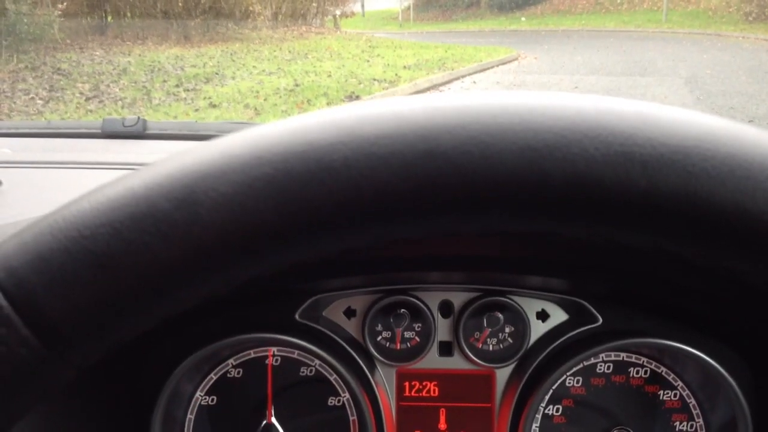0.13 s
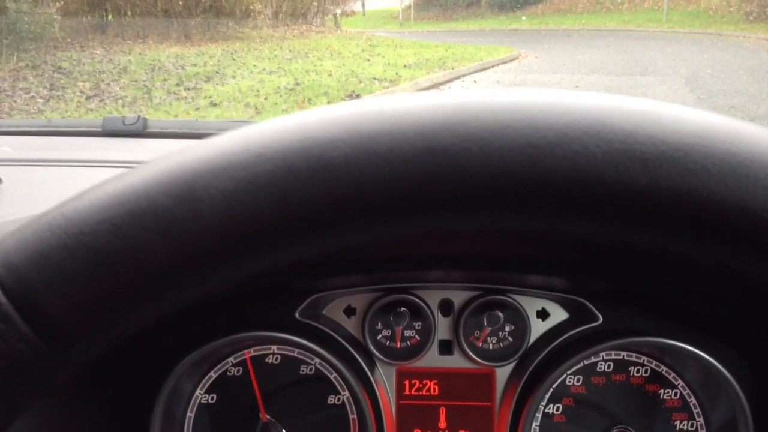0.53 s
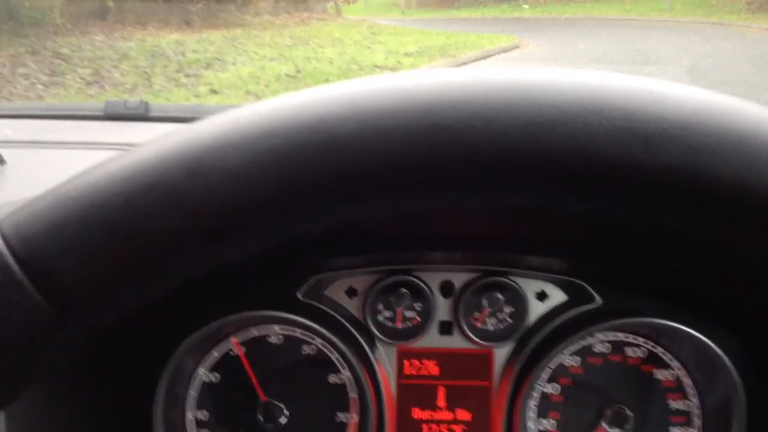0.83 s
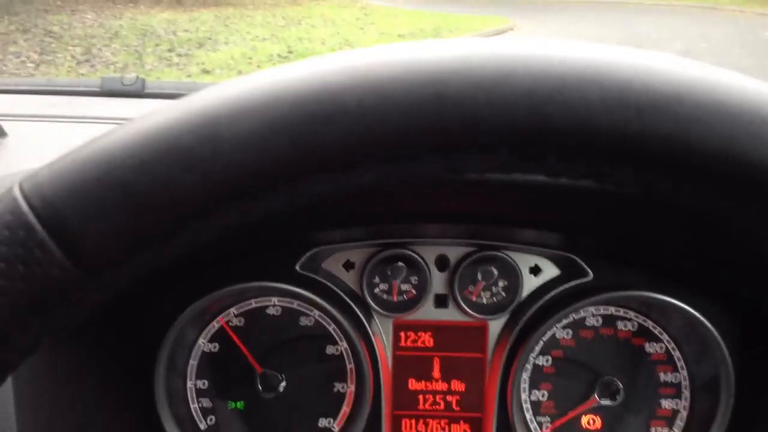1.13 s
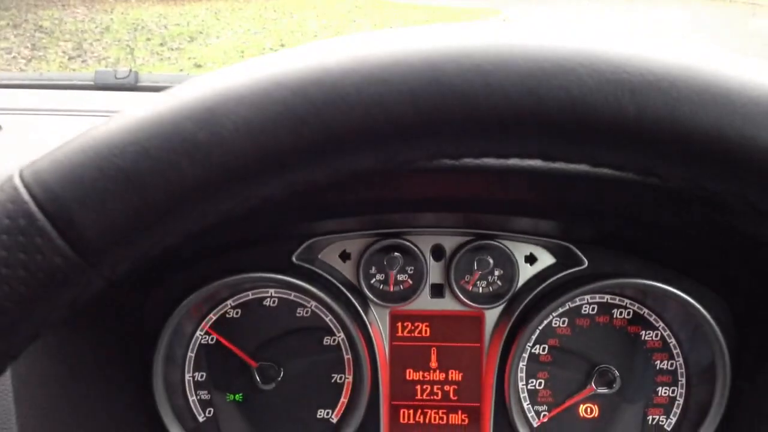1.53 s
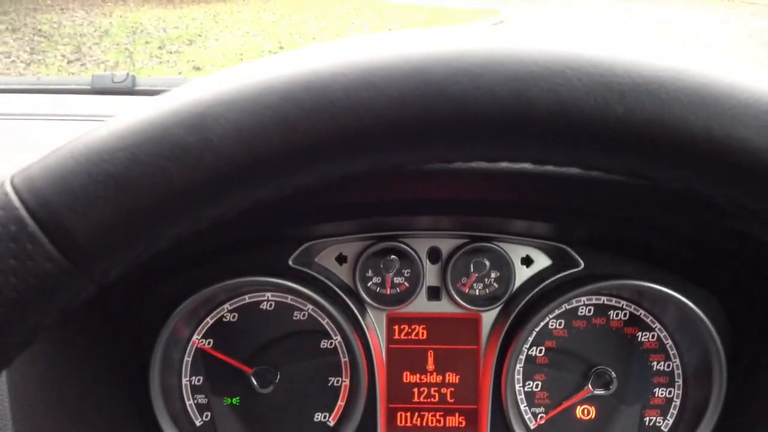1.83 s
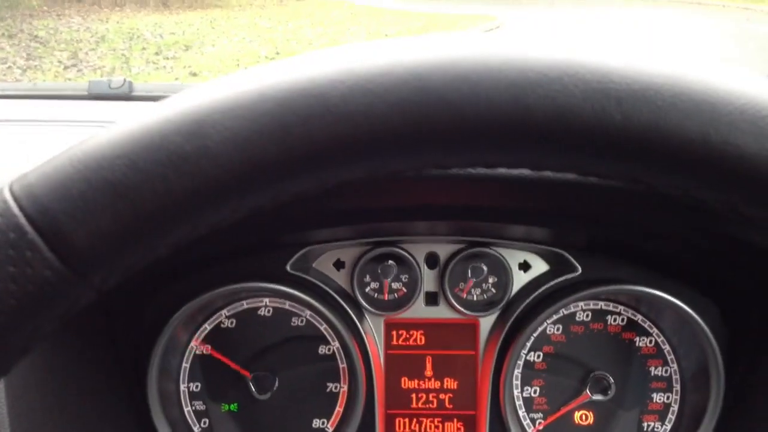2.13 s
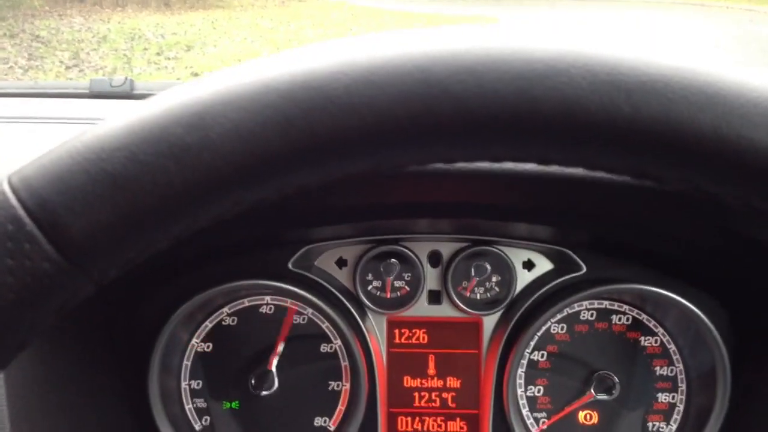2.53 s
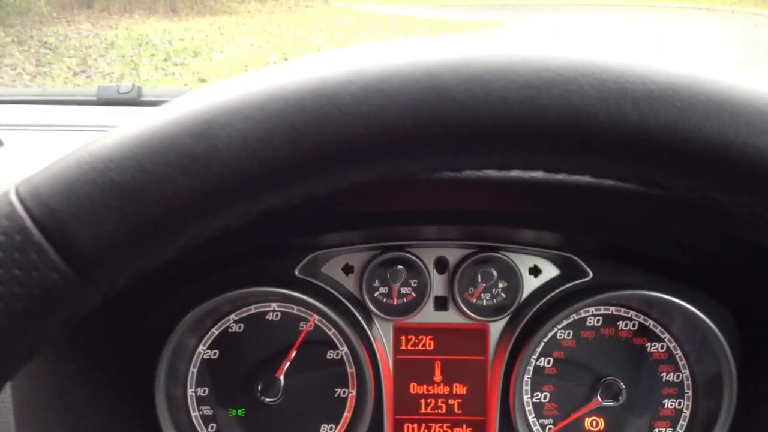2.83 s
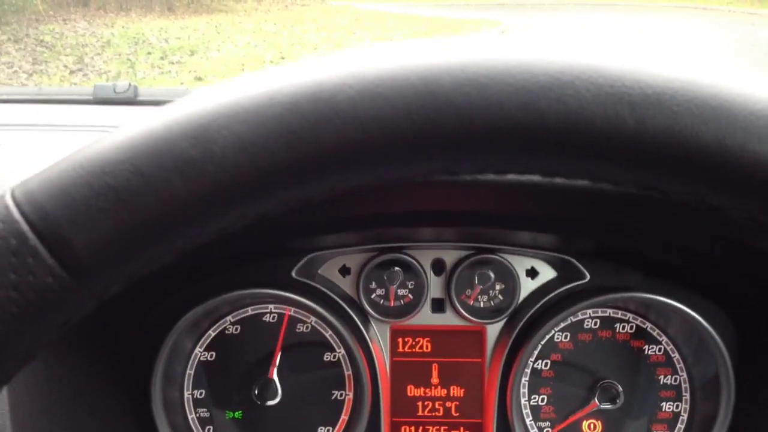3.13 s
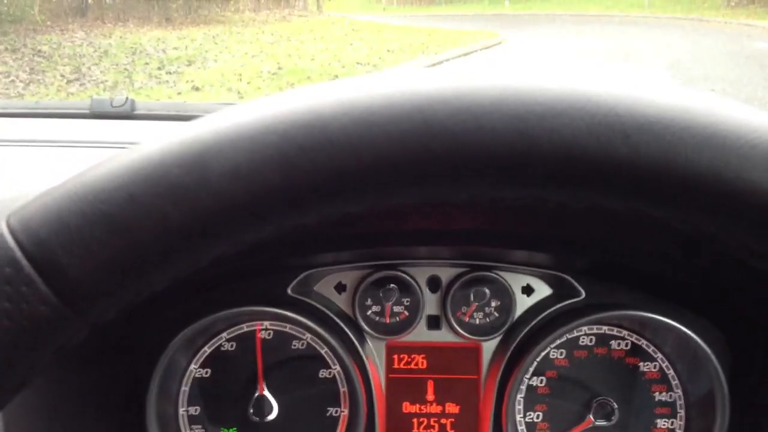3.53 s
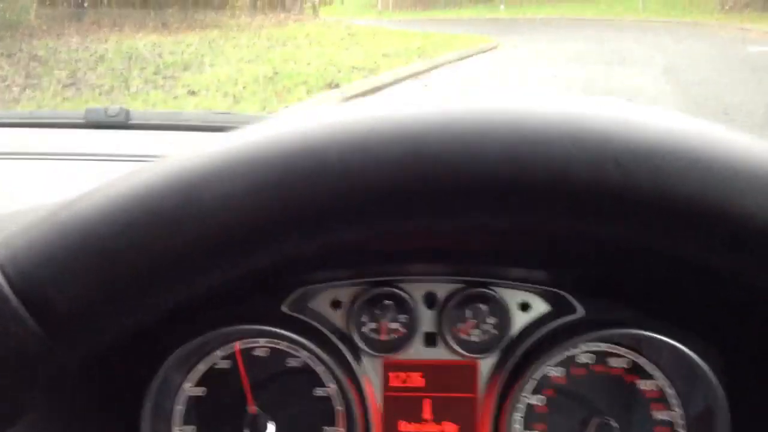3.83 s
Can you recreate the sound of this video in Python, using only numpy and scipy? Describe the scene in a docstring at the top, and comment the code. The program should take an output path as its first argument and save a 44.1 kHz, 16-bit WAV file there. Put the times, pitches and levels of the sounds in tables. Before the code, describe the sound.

Inside a parked car, the engine burbles, revs up, then sinks with a hissing puff.

```python
"""A five-cylinder turbo engine heard from the driver's seat of a parked car.
It winds down under a dying dump-valve hiss; uneven firing rings the exhaust in a soft burble.
From 1.7 s air chirps through a narrow gap in the turbo system, and one throttle blip sweeps the
engine orders through the intake resonance in a growl. At 2.5 s the throttle lifts, the dump valve
vents the boost with a puff and a hiss, and the revs sink again."""
import sys
import numpy as np
from scipy import signal
from scipy.fft import rfft, irfft
from scipy.io import wavfile

SR = 44100
rng = np.random.default_rng(int(sys.argv[2]) if len(sys.argv) > 2 else 0)


def output_pcm(signal):
    """Save a mono or channel-first signal as 16-bit PCM at the path in sys.argv[1].

    Samples are clipped to [-1, 1] before scaling.
    """
    pcm = np.clip(np.atleast_2d(signal).T, -1, 1) * 32767
    wavfile.write(sys.argv[1], SR, np.round(pcm).astype(np.int16))


N = 176400
T = np.arange(N) / SR
BIN_HZ = np.fft.rfftfreq(N, 1 / SR)
FIRING_ORDER, REF_SPEED_RPS = 2.5, 60


def amp(db):
    """Decibels to gain."""
    return 10 ** (np.asarray(db) / 20)


def unit_rms(x):
    """Scale to an rms of 1."""
    return x / np.sqrt(np.mean(x ** 2) + 1e-20)


def curve(rows, column=1):
    """Table column, interpolated over time."""
    rows = np.array(rows)
    return np.interp(T, rows[:, 0], rows[:, column])


def at_hz(spectrum, hz):
    """Spectrum, interpolated over log frequency."""
    freq_hz, value = np.transpose(spectrum)
    return np.interp(np.log(hz + 1), np.log(freq_hz + 1), value)


def wander(rate_hz, points=4000):
    """Low-passed random drift, rms about 1."""
    hz = np.fft.rfftfreq(points, T[-1] / points)
    drift = irfft(rfft(rng.standard_normal(points)) / (1 + (hz / rate_hz) ** 4))
    return np.interp(T, np.linspace(0, T[-1], len(drift)), unit_rms(drift))


def noise(colour, change_db=None):
    """Unit-level coloured noise, then shaped by change_db(hz, t)."""
    hz, t, frames = signal.stft(rng.standard_normal(N), SR, nperseg=1024, noverlap=768)
    gain = unit_rms(amp(at_hz(colour, hz)))[:, None]
    if change_db:
        gain = gain * amp(change_db(hz[:, None], t[None]))
    return signal.istft(frames * gain, SR, nperseg=1024, noverlap=768)[1][:N]


def filtered_noise(gain):
    """Unit-rms noise shaped by one gain per BIN_HZ."""
    return unit_rms(irfft(rfft(rng.standard_normal(N)) * gain, N))


def swell(start_s, length_s):
    """Half-sine envelope."""
    return np.sin(np.pi * np.clip((T - start_s) / length_s, 0, 1))


def rings(rows):
    """One short swell of a resonance per row."""
    return sum(amp(db) * swell(start_s, length_s) * np.sqrt(2) * np.sin(2 * np.pi * hz * (T - start_s))
               for start_s, length_s, hz, db in rows)


def partial(turns, order, rough, rate_hz):
    """One engine order, unsteady in level and phase."""
    angle = 2 * np.pi * (order * turns + rng.random())
    in_phase = (1 + rough * wander(rate_hz)) * np.cos(angle)
    quadrature = rough * wander(rate_hz) * np.sin(angle)
    return np.sqrt(2 / (1 + 2 * rough ** 2)) * (in_phase + quadrature)


def order_stack(speed_rps, turns, pattern, response, other_db, rough, rate_hz):
    """Orders 1 to 21.5 in half steps, except DRONE_ORDERS, swept through a fixed response."""
    levels_db, out = dict(pattern), np.zeros(N)
    for order in np.arange(1, 22, .5):
        if order not in DRONE_ORDERS:
            level_db = levels_db.get(order, other_db) + at_hz(response, order * speed_rps)
            out += amp(level_db) * partial(turns, order, rough, rate_hz)
    return out


DRONE_ORDERS = (2, 2.5, 3, 4)
# Strongest orders: time_s, order_2_db, order_2.5_db, order_3_db, order_4_db
DRONE_LEVELS = [(0, -32, -36, -50, -55), (.18, -43, -29, -45, -52.5), (.3, -42, -38.5, -59, -51),
                (.55, -52.5, -34, -46, -51.5), (.8, -61, -37.5, -69, -57.5), (1.1, -60, -55, -46.5, -72),
                (1.85, -63, -56, -67, -53.5), (2.02, -73, -42, -55, -46), (2.14, -47.5, -26, -51, -49),
                (2.25, -35.5, -27.5, -42, -52), (2.35, -34, -35, -34.5, -34),
                (2.43, -30, -35.5, -43.5, -43), (2.51, -45.5, -46, -33.5, -29.5),
                (2.61, -32, -32.5, -46, -36.5), (2.7, -25, -33, -52.5, -46), (2.82, -34, -49, -34.5, -46),
                (3, -40, -47, -40, -48), (3.14, -36, -36, -46, -49.5), (3.32, -38.5, -34, -50, -65),
                (3.5, -43.5, -40, -49, -52), (3.78, -52, -34, -70, -51.5), (4, -56, -37, -43.5, -63.5)]


def exhaust_drone(turns):
    """Clean low orders of the exhaust."""
    return sum(amp(curve(DRONE_LEVELS, column)) * partial(turns, order, rough=.14, rate_hz=12)
               for column, order in enumerate(DRONE_ORDERS, start=1))


# Weaker orders, throttle shut: order, gain_db
COAST_ORDERS = [(1, -11.5), (1.5, -8.5), (3.5, -6.5), (4.5, -4), (5, 2.5), (5.5, 1.5), (6, 4.5), (7, 5.5),
                (8, 3.5), (9, 4.5), (10, -1), (11, -1), (12, -12.5), (13, -4), (14, -9.5)]
# Cabin response to them: freq_hz, gain_db
CABIN_RESPONSE = [(30, -9), (53, 8), (100, -4.5), (150, 14), (180, 2), (213, 1), (260, -5), (295, 0.5),
                  (320, -7.5), (355, 2.5), (410, -7), (470, -9.5), (530, -8.5), (580, -10.5), (655, 6.5),
                  (705, 0), (745, -16), (778, -3), (820, -26), (870, 0.5), (920, -30), (960, -16.5),
                  (1020, -15), (1450, -15), (2500, -17)]


def coast_hum(speed_rps, turns, gain_db=-55.5, db_per_doubling=13):
    """Rough orders pass through the cabin and grow with speed."""
    orders = order_stack(speed_rps, turns, COAST_ORDERS, CABIN_RESPONSE,
                         other_db=-10, rough=.97, rate_hz=5.5)
    return orders * amp(gain_db + db_per_doubling * np.log2(speed_rps / REF_SPEED_RPS))


# High orders: order, level_db
WHINE_ORDERS = [(9, -47.5), (10, -50), (12, -58), (14, -57.5), (16, -62.5)]
# Cabin resonances: freq_hz, gain_db
WHINE_RESPONSE = [(300, -17), (560, -14.5), (630, -0.5), (690, -1.5), (740, -12.5), (780, -6.5),
                  (825, -15.5), (872, -2.5), (920, -18), (1500, -22)]


def whine(speed_rps, turns):
    """Clean high orders sing as they cross cabin resonances."""
    return sum(amp(level_db + at_hz(WHINE_RESPONSE, order * speed_rps))
               * partial(turns, order, rough=.25, rate_hz=8) for order, level_db in WHINE_ORDERS)


# Rush spectrum: freq_hz, density_db
RUSH_COLOUR = [(120, -34), (200, -7), (235, -5.5), (262, -2), (309, -6.5), (350, 1), (503, -8), (570, -11),
               (624, -5.5), (671, -2.5), (748, -13.5), (818, -19), (880, -13.5), (1020, -18), (1380, -16),
               (1570, -19), (2130, -26.5), (2650, -29), (2900, -30.5), (4090, -35.5), (4720, -37),
               (5070, -41.5), (7970, -41), (10100, -50), (15000, -42)]
# Growth with speed: freq_hz, db_per_doubling
RUSH_GROWTH = [(200, 11.5), (700, 11.9), (1500, 12.2), (3500, 15), (7000, 13.6), (14000, 10)]
# Fixed equaliser: freq_hz, gain_db
RUSH_EQ = [(200, -6), (400, -3), (680, -2.5), (1000, -1.5), (1400, 0), (2100, .5), (4600, -0.5),
           (5200, -4.5), (8000, 0), (10000, -5.5), (15000, -11)]


def rush(speed_rps, turns, load, gain_db=-43, load_db=1, low_cut_hz=290):
    """Air and machinery noise grows with speed and load, and throbs at each firing."""
    def change_db(hz, t):
        doublings = np.log2(np.interp(t, T, speed_rps) / REF_SPEED_RPS)
        growth_db = at_hz(RUSH_GROWTH, hz) * doublings + load_db * np.interp(t, T, load)
        low_cut_db = -10 * np.log10(1 + (low_cut_hz / (hz + 1)) ** 8)
        return growth_db + at_hz(RUSH_EQ, hz) + low_cut_db
    throb = .077 * np.cos(2 * np.pi * FIRING_ORDER * turns)
    lope = .059 * np.cos(np.pi * turns)  # once per two turns
    return amp(gain_db) * noise(RUSH_COLOUR, change_db) * (1 + throb + lope)


# Pipe resonances: pitch_hz, width_hz, level_db
PIPE_MODES = [(1870, 90, -60.5), (2610, 120, -69), (3330, 180, -67), (3970, 80, -64.5), (4640, 170, -60.5),
              (6150, 140, -83)]


def pipe_ring(start_s, fade_db_per_s=28.5):
    """Escaping air rings the pipes."""
    ring = sum(amp(level_db) * filtered_noise(1 / (1 + (2 * (BIN_HZ - pitch_hz) / width_hz) ** 2))
               for pitch_hz, width_hz, level_db in PIPE_MODES)
    return ring * amp(-fade_db_per_s * np.maximum(T - start_s, 0))


# Valve hiss spectrum: freq_hz, density_db
VALVE_COLOUR = [(1500, -5.5), (2500, -9), (3300, 8), (4200, -9), (4700, -8), (5100, -12), (6000, -3),
                (7000, -3.5), (8200, -2.5), (9200, -11), (10300, -15.5), (12800, -16), (15000, -19)]
# Hiss decay: freq_hz, fade_db_per_s
VALVE_FADE = [(2000, 19), (3400, 29.6), (5800, 33.8), (8000, 55), (13000, 30)]
# Valve openings, the first heard only as a tail: start_s, level_db
VALVE_RELEASES = [(-.42, -46), (2.478, -49.5)]


def dump_valve(start_s, level_db, rise_s=.032, hold_s=.059):
    """Boost escapes; the jet's bright centre sinks with the pressure while the pipes ring on."""
    def change_db(hz, t, from_hz=9000, to_hz=4900, sink_s=.13, width_hz=1300, peak_db=6):
        age_s = np.maximum(t - start_s, 0)
        centre_hz = to_hz + (from_hz - to_hz) * np.exp(-age_s / sink_s)
        jet_db = peak_db * (np.exp(-((hz - centre_hz) / width_hz) ** 2) - .5)
        return jet_db - at_hz(VALVE_FADE, hz) * np.maximum(age_s - rise_s - hold_s, 0)
    opening = np.clip((T - start_s) / rise_s, 0, 1)
    return opening * (pipe_ring(start_s) + amp(level_db) * noise(VALVE_COLOUR, change_db))


# Background spectrum: freq_hz, density_db
BACKGROUND_COLOUR = [(30, -11), (70, -10.5), (300, 1.5), (700, 0), (1500, -15.5), (3000, -20), (5200, -23),
                     (7800, -22), (10000, -31), (12500, -23.5), (15000, -24)]


def background_hiss(level_db=-62.5):
    """Faint steady hiss."""
    return amp(level_db) * noise(BACKGROUND_COLOUR)


# Overrun boom envelope: time_s, level_db
BOOM_LEVEL = [(0, -64), (.2, -61), (.27, -39), (.55, -44), (.95, -42), (1.25, -46), (1.55, -48),
              (1.72, -46), (1.9, -59), (2.35, -48), (2.6, -40.5), (2.8, -59), (3.3, -57), (3.35, -38.5),
              (3.6, -37.5), (4, -42.5)]
# Boom spectrum: freq_hz, density_db
BOOM_COLOUR = [(25, -35), (40, -21.5), (52, -23), (62, -24), (75, -7.5), (98, -10), (118, 4.5), (132, 4.5),
               (155, 4.5), (185, -17), (215, -4.5), (260, -25.5), (500, -69.5)]
# Single burbles: start_s, length_s, pitch_hz, level_db
BURBLES = [(1.334, 0.11, 134, -36.5), (1.482, 0.042, 134, -44), (1.514, 0.034, 137, -37),
           (1.56, 0.099, 129.8, -36), (1.61, .16, 213, -50), (2.465, .06, 91.5, -46),
           (2.48, 0.094, 128.3, -40), (3.325, 0.012, 170.2, -51)]


def exhaust_boom():
    """Uneven firing on the overrun rings the exhaust; a few burbles stand out."""
    rumble = filtered_noise(amp(at_hz(BOOM_COLOUR, BIN_HZ)))
    return amp(curve(BOOM_LEVEL)) * rumble + rings(BURBLES)


# Air chirps: start_s, length_s, from_hz, to_hz, tone_db, air_db
CHIRPS = [(1.748, .028, 4300, 4100, -77, -74), (1.815, .035, 4900, 3900, -73, -72),
          (2.222, .026, 4000, 5000, -57, -62), (2.236, .017, 7100, 7300, -58, -72),
          (2.234, .046, 6300, 5900, -70, -61), (2.272, .034, 4850, 4600, -64, -78)]
# Escaping air spectrum: freq_hz, density_db
AIR_COLOUR = [(2500, -1.5), (4200, -2), (8300, 0), (9800, -11), (13000, -10), (15000, -9.5)]


def turbo_chirps(waver=.044):
    """Air squeezes through a narrow gap in short gliding whistles."""
    air, out = noise(AIR_COLOUR), np.zeros(N)
    for start_s, length_s, from_hz, to_hz, tone_db, air_db in CHIRPS:
        progress = np.clip((T - start_s) / length_s, 0, 1)
        pitch_hz = (from_hz + (to_hz - from_hz) * progress) * (1 + waver * wander(rate_hz=250))
        tone = np.sqrt(2) * np.sin(2 * np.pi * np.cumsum(pitch_hz) / SR)
        arch = 4 * progress * (1 - progress)
        out += amp(tone_db) * arch * tone + amp(air_db) * np.sqrt(arch) * air
    return out


# Growl envelope, high with the throttle open: time_s, gain_db
THROTTLE = [(0, -74), (1.86, -88), (1.9, -54.5), (2, -40.5), (2.12, -37.5), (2.25, -33.5), (2.32, -35),
            (2.42, -38.5), (2.5, -66), (2.6, -79), (4, -73.5)]
# Orders under load: order, gain_db
LOAD_ORDERS = [(3.5, -3.5), (4.5, 6.5), (5, -18), (5.5, 0), (6, -2), (6.5, 2), (7, -7.5), (7.5, 6)]
# Intake response: freq_hz, gain_db
INTAKE_RESPONSE = [(100, -35.5), (170, -13), (235, -4), (265, -0.5), (290, 1), (320, -7), (385, -5),
                   (460, -21), (640, -12.5), (780, -29), (1400, -28.5), (2500, -31)]
# Honks of the intake resonance: start_s, length_s, pitch_hz, level_db
HONKS = [(1.885, 0.063, 294, -42.5), (1.986, 0.011, 295.2, -38), (2.115, 0.05, 287.4, -22),
         (2.207, 0.066, 287.6, -21)]


def intake_growl(speed_rps, turns):
    """Under load, rough orders sweep through the intake resonance; it honks at set times."""
    orders = order_stack(speed_rps, turns, LOAD_ORDERS, INTAKE_RESPONSE,
                         other_db=-4.1, rough=.71, rate_hz=20.3)
    return amp(curve(THROTTLE)) * orders + rings(HONKS)


# Rasp envelope, peaking near the top of the blip: time_s, level_db
RASP_LEVEL = [(0, -101), (1.9, -65), (2.1, -52), (2.2, -49.5), (2.33, -50), (2.43, -38), (2.54, -43.5),
              (2.62, -47), (2.9, -65), (4, -90)]
# Rasp spectrum: freq_hz, density_db
RASP_COLOUR = [(150, -29), (330, -5.5), (430, 6.5), (480, 1.5), (540, -1.5), (680, 7), (790, -12), (870, 8),
               (1020, -17.5), (1400, -15), (2000, -16), (3000, -57.5), (6000, -53)]


def rasp(turns):
    """Turbulent air, one puff per firing, as the engine pulls hard."""
    throb = .5 * np.cos(2 * np.pi * FIRING_ORDER * turns)
    return amp(curve(RASP_LEVEL)) * noise(RASP_COLOUR) * (1 + throb)


def valve_puff(start_s, level_db, offset_db=-8):
    """Short bright puff as the valve leaves its seat."""
    return amp(level_db + offset_db) * swell(start_s, length_s=.03) * noise(AIR_COLOUR)


def cabin_echoes(x, t60_s=.2, wet_db=-12, taps=6000):
    """Direct sound plus dense, short echoes off glass and trim."""
    tail = rng.standard_normal(taps) * np.exp(-np.log(1000) * T[:taps] / t60_s)
    echoes = signal.fftconvolve(x, tail / np.linalg.norm(tail))[:N]
    return (x + amp(wet_db) * echoes) / np.sqrt(1 + amp(wet_db) ** 2)


# Crankshaft speed: time_s, speed_rps
CRANK_SPEED = [(0, 64.5), (.3, 57.7), (.6, 50.5), (1, 44), (1.4, 35.2), (1.72, 31.9), (1.88, 32.5),
               (2, 40.5), (2.14, 53.7), (2.24, 66.1), (2.4, 81), (2.47, 90), (2.55, 86.5), (2.75, 80.2),
               (3, 72), (3.4, 61.8), (3.7, 56.3), (4, 50.5)]


def scene(duck_db=8.5):
    """Mono cabin mix; hum and whine give way while the throttle is open."""
    speed_rps = curve(CRANK_SPEED)
    turns = np.cumsum(speed_rps) / SR
    load = amp(curve(THROTTLE) - curve(THROTTLE).max())  # 0 to 1
    engine = exhaust_drone(turns)
    engine += (coast_hum(speed_rps, turns) + whine(speed_rps, turns)) * amp(-duck_db * np.sqrt(load))
    engine += intake_growl(speed_rps, turns) + exhaust_boom()
    air = rush(speed_rps, turns, load) + rasp(turns)
    air += sum(dump_valve(*row) + valve_puff(*row) for row in VALVE_RELEASES)
    return (engine + cabin_echoes(air) + turbo_chirps() + background_hiss())[None]


def record(dry, cutoff_hz=15250):
    """Steep low-pass."""
    low_pass = signal.firwin(511, cutoff_hz, window=("kaiser", 9), fs=SR)
    return signal.oaconvolve(dry, low_pass[None], "same")


dry = scene()
out = record(dry)
output_pcm(out)
```